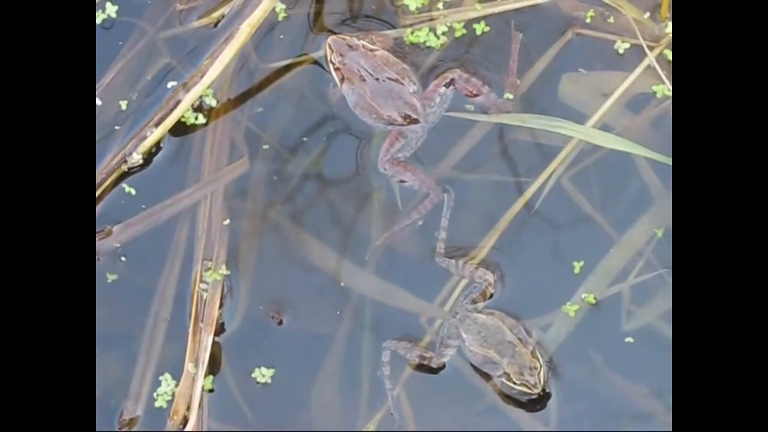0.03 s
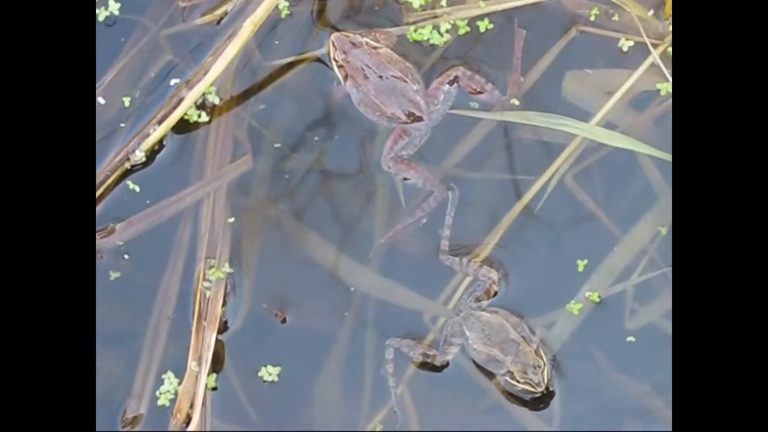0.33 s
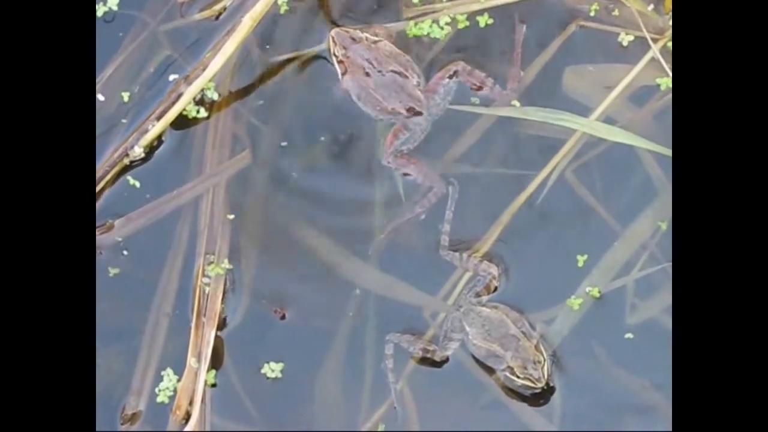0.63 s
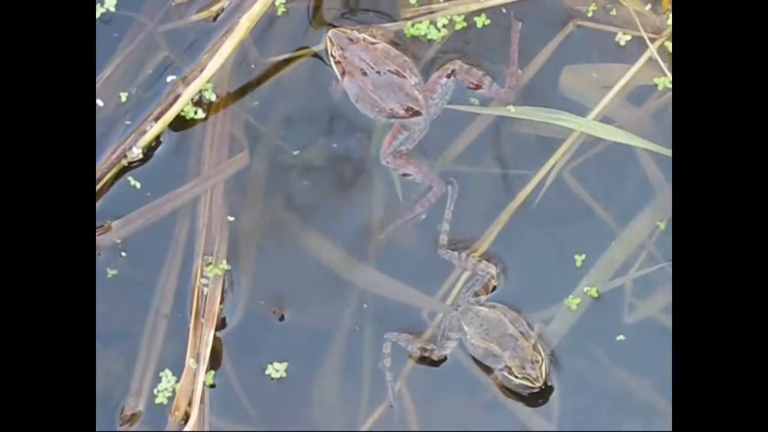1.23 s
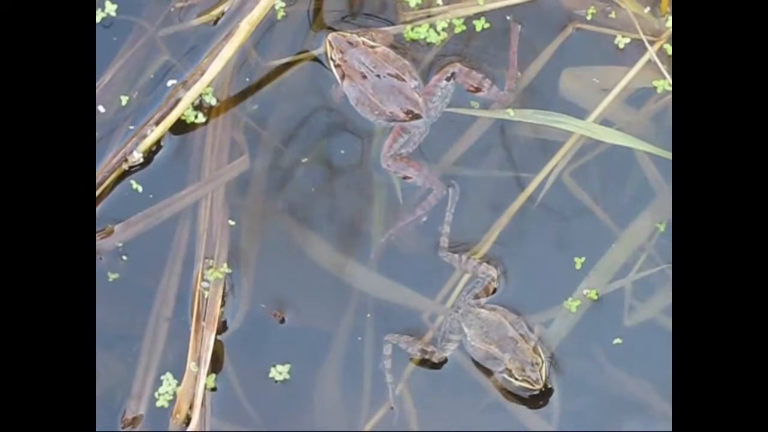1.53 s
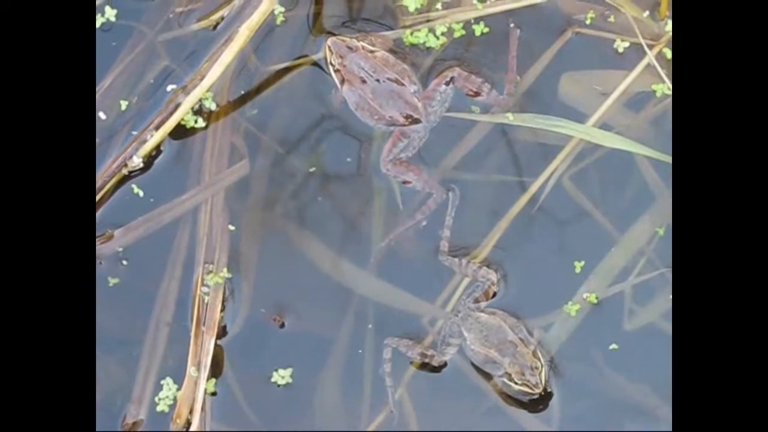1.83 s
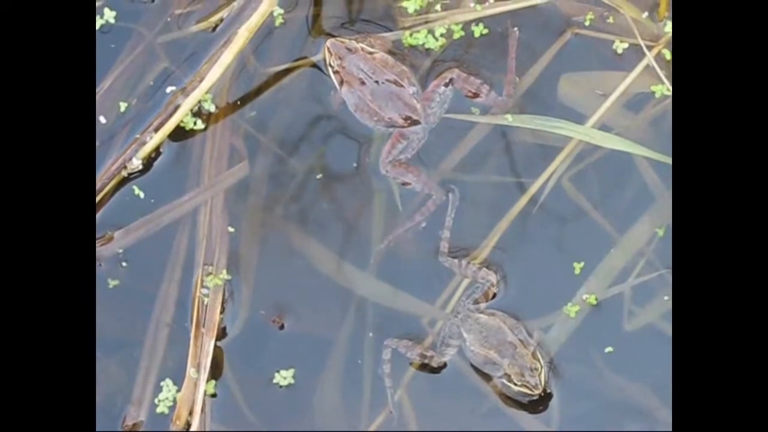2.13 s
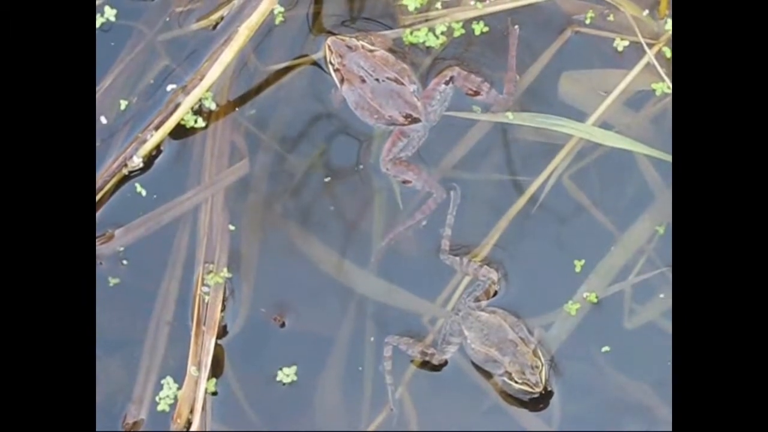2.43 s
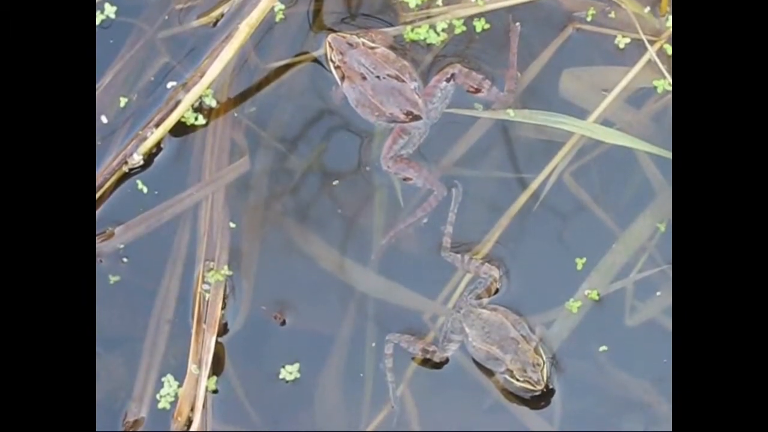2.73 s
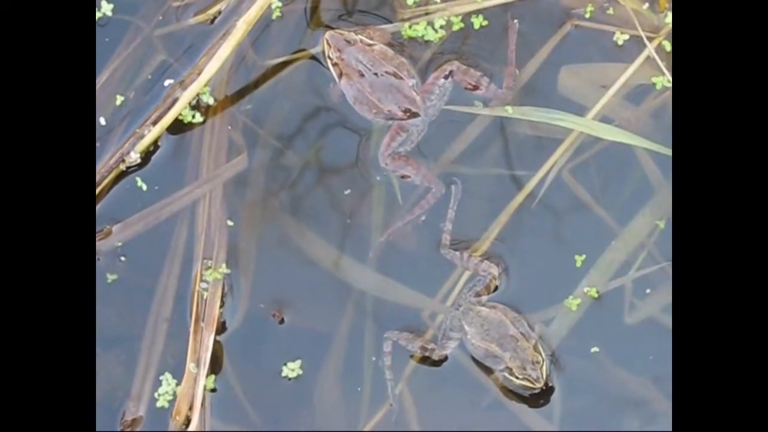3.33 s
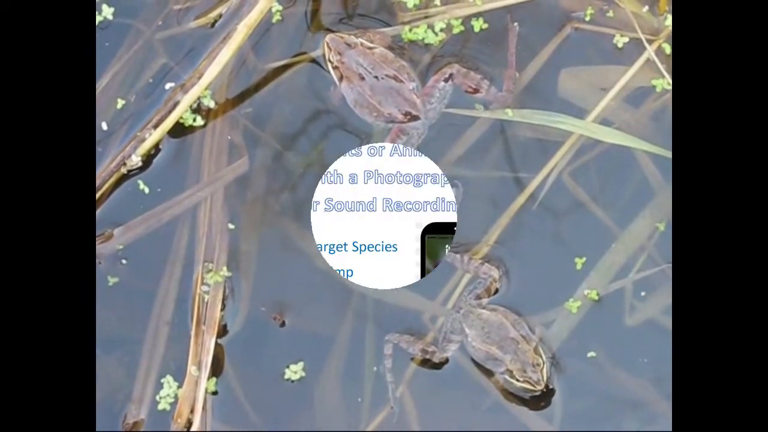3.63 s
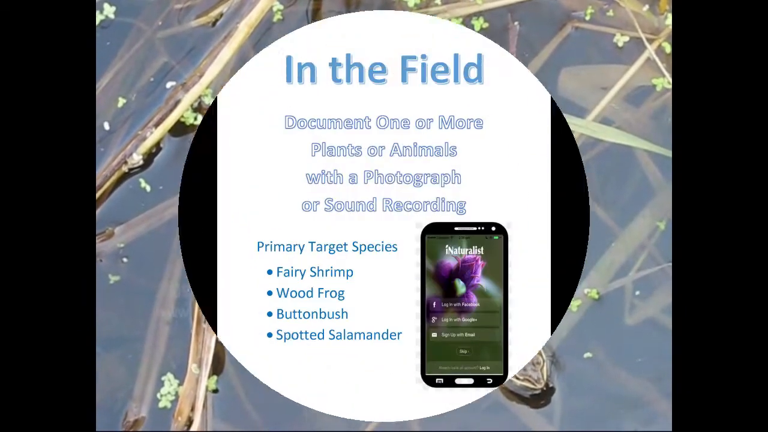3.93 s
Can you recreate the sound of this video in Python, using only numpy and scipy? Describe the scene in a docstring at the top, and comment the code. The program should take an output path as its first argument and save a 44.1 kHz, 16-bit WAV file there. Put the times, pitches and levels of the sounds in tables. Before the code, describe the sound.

Frogs quack continuously in quick, irregular bursts near the microphone at an outdoor pond. Smaller frogs add ticking trills like a thumb along a comb, a few lower croaks break in, and far-off frog chatter fills the gaps.

```python
"""A shallow spring pond, one microphone a few metres from the nearest frogs. They give short, duck-like
quacks, each a rattle of pulses ringing in the vocal sacs, and some hollow croaks. A smaller kind runs
through slowing trills of high ticks, like a thumb along a comb. A far chorus fills the gaps over soft
hiss and a faint hum, the reeds scatter every call, and the loudest pulses flatten in the recorder."""
import sys
import numpy as np
from scipy import signal
from scipy.fft import rfft, irfft, next_fast_len
from scipy.io import wavfile

SR = 44100
rng = np.random.default_rng(int(sys.argv[2]) if len(sys.argv) > 2 else 0)


def wrap_up_sound(samples):
    """Save the sound to the file named by the first command line argument, as 16-bit audio."""
    columns = np.atleast_2d(samples).T
    # keep every value between -1 and 1, then stretch to whole-number steps
    tamed = np.clip(columns, -1, 1)
    steps = np.round(tamed * 32767).astype(np.int16)
    wavfile.write(sys.argv[1], SR, steps)


N = 176400
CALL_T = np.arange(int(.12 * SR)) / SR  # time axis of one call, in seconds
RING_T = CALL_T[:len(CALL_T) // 4]  # time axis of one pulse or tick
SMALL_BODY = signal.butter(8, [640, 7000], "bandpass", fs=SR, output="sos")

# Vocal sac resonances of a quack, near or far.
# Each row: multiple of the pitch, relative level in dB, seconds to fall 60 dB.
SAC_MODES = [(1.0, 2.5, 0.018), (.84, -2, 0.026), (1.17, -1, 0.007), (.62, -14, 0.021), (.42, -20, 0.023),
             (1.42, -4.5, 0.0068)]


def amp(db):
    """Decibels to amplitude."""
    return 10 ** (np.asarray(db) / 20)


def unit(x):
    """Scale to an RMS of one."""
    return x / np.sqrt(np.mean(x ** 2) + 1e-20)


def add(track, s, sound):
    """Mix a sound in from s seconds on."""
    i = int(round(s * SR))
    a, b = max(i, 0), min(i + len(sound), N)
    if b > a:
        track[a:b] += sound[a - i:b - i]


def coloured(x, points):
    """Pass x through a gain curve of (Hz, dB) points."""
    size = next_fast_len(len(x) + 4096)
    hz, db = np.transpose(points)
    gain = amp(np.interp(np.log(np.fft.rfftfreq(size, 1 / SR) + 1), np.log(hz), db))
    return irfft(rfft(x, size) * gain, size)[:len(x)]


def reed_echo(x, t60_s):
    """Diffuse echo off the reeds; calls come from ever new places, so the tail keeps changing."""
    t, out = np.arange(SR // 4) / SR, np.zeros(N)
    hop = N // 24
    padded = np.pad(x, (hop, 2 * hop))
    for i in range(0, N + hop, hop):
        tail = rng.standard_normal(len(t)) * 1000 ** (-t / t60_s) * (1 - np.exp(-t / 0.0014))
        piece = padded[i:i + 2 * hop] * np.sqrt(np.hanning(2 * hop))
        add(out, (i - hop) / SR, signal.fftconvolve(piece, tail / np.linalg.norm(tail)))
    return out


def outdoor_air():
    """Soft hiss of the open air, with a faint hum in the distance."""
    # Colour of the hiss. Each row: frequency in Hz, relative level in dB.
    hiss_colour = [(20, -3), (100, -2), (450, 0), (3000, 4.5), (7000, -17.5), (8000, -30), (9500, -23),
                   (15000, -28.5)]
    # Tones of the hum. Each row: frequency in Hz, RMS level in dB.
    hum_tones = [(102, -75.5), (204, -73.5)]
    t = np.arange(N) / SR
    hiss = amp(-53) * unit(coloured(rng.standard_normal(N), hiss_colour))
    return hiss + sum(amp(db) * np.sqrt(2) * np.sin(2 * np.pi * hz * t) for hz, db in hum_tones)


def tiny_snap(start_s=3.682, t60_s=0.011):
    """One faint, very high snap."""
    out = np.zeros(N)
    burst = rng.standard_normal(len(CALL_T)) * 1000 ** (-CALL_T / t60_s)
    add(out, start_s, amp(-36.5) * np.diff(burst, 2) / 2)  # differencing tilts it to the treble
    return out


def far_chorus(quacks_per_s=45, lull_db=11, lull_half_s=.016):
    """Far out on the pond, dozens of quacks merge into a chatter with brief lulls."""
    # Colour of the chorus at the microphone. Each row: frequency in Hz, relative gain in dB.
    far_colour = [(300, -46.5), (540, -26), (700, 7), (900, 9.5), (1250, -3), (1700, 0.5), (2200, 2.5),
                  (2800, 3.5), (5000, -13.5), (9000, -8)]
    # Lulls in the chorus. Each entry: the quietest moment in seconds.
    lull_times = [0.06, .33, 0.602, 0.649, 1.535, 1.776, 2.171, 2.352, 2.798, 3.259, 3.577, 3.787, 3.90]
    calls = np.zeros(N)
    for k in range(quacks_per_s * N // SR + 1):
        call = quack(1700 * np.exp(rng.normal(0, .11)), half_s=.013, rasp_db=-7.5, modes=SAC_MODES)
        add(calls, (k + rng.uniform(-.5, .5)) / quacks_per_s - CALL_T.mean(), call)
    chatter = coloured(calls + amp(-8) * reed_echo(calls, t60_s=.16), far_colour)
    lulls = sum(np.exp(-((np.arange(N) / SR - s) / lull_half_s) ** 2) for s in lull_times)
    return unit(chatter) * amp(-34 - lull_db * lulls)


def tick(hz, rise_s=.0015, decay_s=.0023):
    """A short ping that falls in pitch, with a weak upper resonance that fades along with it."""
    pitch = hz * (1 + 0.099 * np.exp(-RING_T / 0.0012) - 4.7 * RING_T)  # quick drop, then a slow sag
    phase = 2 * np.pi * np.cumsum(pitch) / SR
    decay = np.exp(-RING_T / decay_s)
    envelope = (1 - np.exp(-(RING_T / rise_s) ** 2)) * decay
    upper = amp(-19) * decay * np.sin(1.517 * phase)
    return envelope / envelope.max() * (np.sin(phase) + upper)


def trill(first_s, last_s, gap_s, growth_s, first_db, last_db, hz):
    """A run of ticks that slows, slides in level and climbs a little in pitch."""
    out, k = np.zeros(N), np.arange(16)
    times = first_s + k * gap_s + growth_s * k * (k - 1) / 2
    for s in [*times[times < last_s - gap_s / 2], last_s]:
        progress = (s - first_s) / (last_s - first_s)
        db = first_db + progress * (last_db - first_db) + rng.normal(0.12, 1.37)
        db -= 1.5 * (s == last_s)  # the closing tick is weaker
        pitch = hz * rng.normal(1 + .02 * (progress - .5), 0.021)
        add(out, s, amp(db) * tick(pitch))
    return out


def trilling_frogs(far_per_s=6):
    """The smaller frogs: clear trills close by, faint ones with more echo from across the pond."""
    # Near trills. Each row: first tick, last tick, first gap and growth of each gap, all in seconds,
    # then opening and closing relative level in dB, pitch in Hz.
    near_trills = [(.0055, .262, .0382, .0025, -20, -15, 3430), (.023, .114, .045, .002, -27, -24, 3150),
                   (.380, .494, .025, .002, -23, -25, 3450), (.598, .773, .042, .0012, -27, -19, 3740),
                   (.947, 1.182, .033, .002, -25, -24, 3520), (1.2157, 1.587, .0279, .0022, -20, -19, 3470),
                   (1.491, 1.812, .031, .0024, -28, -23, 3130),
                   (2.025, 2.375, .0259, .0033, -26, -17, 3640),
                   (2.411, 2.584, .040, .0022, -19, -25, 3700),
                   (2.662, 3.032, .0266, .0024, -22, -18, 3470), (2.794, 2.958, .038, .002, -27, -21, 3380),
                   (3.621, 3.975, .030, .0023, -26, -17, 3540)]
    near, far = sum(trill(*row) for row in near_trills), np.zeros(N)
    for k in range(-1, far_per_s * N // SR):
        s = (k + rng.random()) / far_per_s
        far += trill(s, s + .36, gap_s=rng.uniform(0.029, 0.038), growth_s=.0024,
                     first_db=-34.5, last_db=-31.5, hz=3400 * rng.normal(1, 0.04))
    return near + far + reed_echo(amp(-9) * near + far, t60_s=.16)


def rattle(half_s, gap_s=.0042, gap_shrink=.93, each_side=10):
    """Quickening pulses that swell to a main one in the middle of the call, then fade."""
    k = np.arange(-each_side, each_side + 1)
    gaps = gap_s * gap_shrink ** np.maximum(k, -1) * np.exp(.16 * rng.standard_normal(len(k)))
    times = np.cumsum(gaps)
    times -= times[each_side]
    fade_db = 9.5 * (np.abs(times) / half_s * np.where(k < 0, 1.2, 1)) ** 1.37  # the rise is steeper
    pulse_db = np.where(k == 0, -0.5, rng.normal(0, 4, len(k)) - fade_db)
    samples = np.clip(np.round(times * SR).astype(int) + len(CALL_T) // 2, 0, len(CALL_T) - 1)
    return np.bincount(samples, amp(pulse_db), len(CALL_T))


def quack(hz, half_s, rasp_db, modes, rasp_t60_s=0.012):
    """A rattle of pulses rings the vocal sacs and sets off a high rasp."""
    # Colour of the rasp. Each row: frequency in Hz, relative gain in dB.
    rasp_colour = [(600, -60), (2000, -23), (3000, 5.5), (4200, -1.5), (5300, -1), (6300, -3), (7000, -14),
                   (8000, -39), (12000, -25.5), (16000, -32.5)]
    pulses, ring = rattle(half_s), np.zeros(len(RING_T))
    for ratio, db, t60_s in modes:
        envelope = amp(db + rng.normal(0, 1.53)) * 1000 ** (-RING_T / t60_s)
        polarity = 1 if ratio <= 1 else -1
        ring += polarity * envelope * np.sin(2 * np.pi * hz * ratio * rng.normal(1, 0.024) * RING_T)
    body = signal.sosfilt(SMALL_BODY, signal.fftconvolve(pulses, ring)[:len(CALL_T)])
    buzz = rng.standard_normal(len(RING_T))
    buzz += 0.33 * np.sin(2 * np.pi * hz * 2.997 * rng.normal(1, 0.083) * RING_T)
    buzz *= 1000 ** (-RING_T / rasp_t60_s)
    rasp = coloured(signal.fftconvolve(pulses, buzz)[:len(CALL_T)], rasp_colour)
    loud_part = np.abs(CALL_T - CALL_T.mean()) < 0.012
    return body / body[loud_part].std() + amp(rasp_db + 0.5) * rasp / rasp[loud_part].std()


def overload_thumps(rise_s=.0005):
    """Dull low thumps as a few sharp quacks overload the recorder."""
    # Overload thumps. Each row: start in seconds, peak level in dB.
    thumps = [(.479, -42), (1.377, -34), (2.145, -42), (2.659, -44)]
    out = np.zeros(N)
    for s, db in thumps:
        add(out, s, amp(db) * CALL_T / rise_s * np.exp(1 - CALL_T / rise_s))
    return out


def near_frogs():
    """Quacks and hollow croaks a few metres from the microphone, mixed with the overload thumps."""
    # Near quacks. Each row: main pulse in seconds, relative level in dB, sac pitch in Hz,
    # half length in seconds, relative rasp level in dB.
    quacks = [(0.0272, -28, 1990, 0.0051, -24), (0.1577, -37, 1900, 0.0057, -9),
              (0.2386, -27.5, 1807, 0.0028, -27), (0.287, -27.5, 1935, 0.017, -22),
              (0.3754, -28, 1700.0, 0.01, -25), (0.42, -30.5, 1824, 0.015, -16.5),
              (0.43, -43.5, 1610, 0.013, -37), (0.4786, -27.5, 1876, 0.021, -17),
              (0.4995, -24, 1860, 0.0072, -18.0), (0.626, -25.5, 1932, 0.0066, -18),
              (0.689, -32, 2270, 0.0023, -16), (0.776, -27, 1785, 0.013, -28),
              (0.807, -36.5, 1670, 0.0065, -9), (0.828, -24.5, 1790, 0.014, -22.5),
              (0.933, -28.5, 1780, 0.0083, -28.0), (0.991, -27.8, 1890, 0.023, -20),
              (1.0457, -32, 1750, 0.022, -23), (1.0842, -24, 1760, 0.022, -22.5),
              (1.143, -27, 2297, 0.017, -20.5), (1.2341, -31, 1950, 0.0044, -27),
              (1.328, -27, 1616, 0.0026, -25), (1.3765, -24.5, 1720, 0.0078, -17.5),
              (1.432, -27.5, 1860, 0.0083, -23.5), (1.499, -30.5, 1750, 0.014, -14),
              (1.6556, -26.5, 2210, 0.0054, -21), (1.717, -24.7, 2030, 0.017, -14.5),
              (1.8607, -28.5, 1610, 0.022, -22), (1.889, -27, 1760, 0.0044, -29.0),
              (1.9328, -26.5, 1830, 0.0068, -20.5), (2.0887, -27, 1770, 0.028, -15),
              (2.1445, -23.5, 2010, 0.0077, -23.5), (2.2063, -31.5, 1830, 0.0097, -19),
              (2.256, -28, 1630, 0.016, -22), (2.2957, -29.5, 1760, 0.023, -26.0),
              (2.482, -27, 1700, 0.012, -40), (2.53, -30, 1810, 0.019, -16.5),
              (2.579, -30.5, 1990, 0.011, -17), (2.609, -28.0, 1817, 0.017, -17),
              (2.654, -26, 2010, 0.011, -14), (2.7247, -28.0, 1854, 0.0088, -19),
              (2.7755, -28, 1985, 0.013, -23), (3.094, -28, 1906, 0.015, -14),
              (3.149, -27, 1696, 0.039, -27.5), (3.1858, -25, 1860, 0.0061, -38),
              (3.228, -25.5, 1970, 0.0069, -17.5), (3.3883, -27.5, 1795, 0.027, -16.5),
              (3.4281, -28.5, 1670, 0.0095, -30), (3.493, -27, 1870.0, 0.017, -17.5),
              (3.5316, -26, 1950.0, 0.013, -18.5), (3.561, -33, 1930, 0.0048, -30),
              (3.59, -29.5, 1753, 0.0066, -15.5), (3.6546, -32, 1950, 0.015, -20.5),
              (3.681, -26.5, 1830, 0.014, -20), (3.7452, -29, 1730, 0.0087, -19),
              (3.9467, -28.5, 1770, 0.0041, -18)]
    # Low croaks. Each row: main pulse in seconds, relative level in dB, pitch in Hz.
    croaks = [(0.1, -32, 1124), (0.21, -35.5, 765), (0.445, -35, 725), (0.75, -37.5, 740),
              (1.04, -35.5, 767), (1.3, -44, 754), (2.06, -35, 735), (2.54, -36.5, 830), (3.15, -31, 814),
              (3.39, -35, 790), (3.46, -36, 735), (3.808, -30, 1200), (3.85, -28, 1172)]
    # Croak resonances. Each row: multiple of the pitch, relative level in dB, seconds to fall 60 dB.
    hollow_modes = [(1.0, 10.5, 0.026), (1.3, -15.5, 0.013), (2.2, -24.5, 0.0065)]
    out = overload_thumps()
    for s, db, hz, half_s, rasp_db in quacks:
        add(out, s - CALL_T.mean(), amp(db - 0.5) * quack(hz, half_s, rasp_db, SAC_MODES))
    for s, db, hz in croaks:
        croak = quack(hz, half_s=.012, rasp_db=-38, modes=hollow_modes)
        add(out, s - CALL_T.mean(), amp(db - 1.5) * croak)
    return out + amp(-10) * reed_echo(out, t60_s=.03)


def scene():
    """The whole pond, in mono."""
    return (near_frogs() + far_chorus() + trilling_frogs() + outdoor_air() + tiny_snap())[None]


def record(dry, ceiling=.235, hardness=16, top_hz=16000):
    """The loudest pulses flatten against the recorder's ceiling; nothing passes above its band limit."""
    flattened = dry / (1 + np.abs(dry / ceiling) ** hardness) ** (1 / hardness)
    return irfft(rfft(flattened) * (np.fft.rfftfreq(N, 1 / SR) < top_hz), N)


dry = scene()
out = record(dry)
wrap_up_sound(out)
```